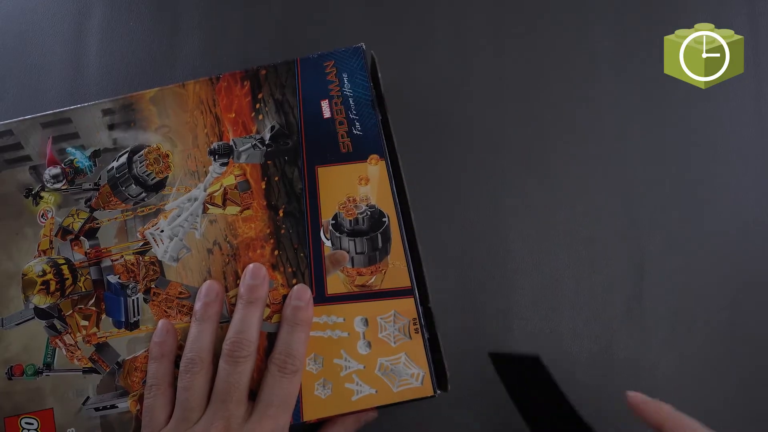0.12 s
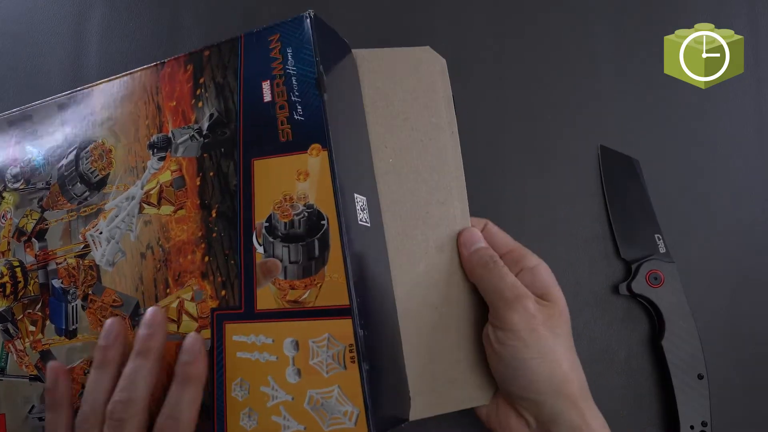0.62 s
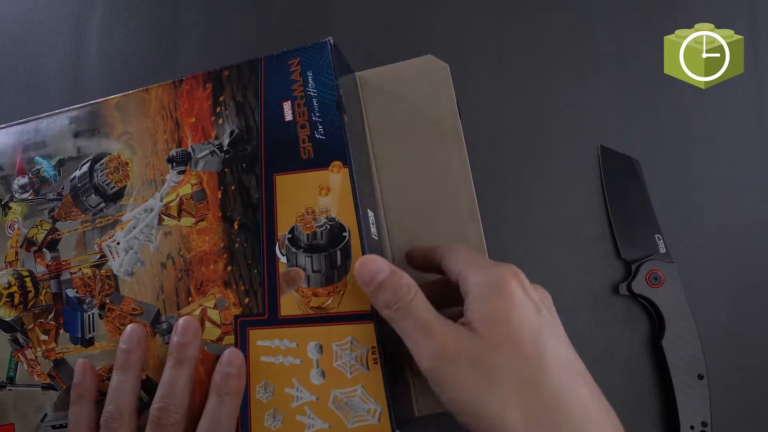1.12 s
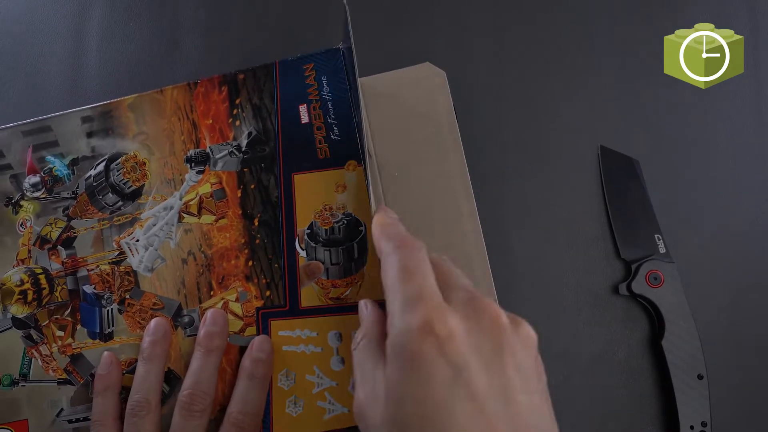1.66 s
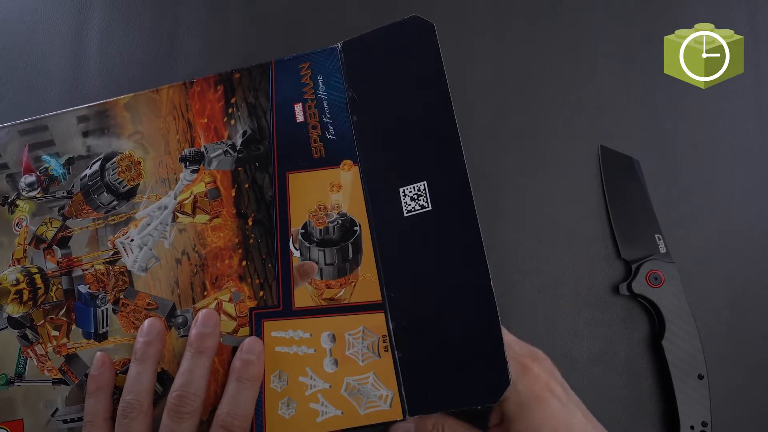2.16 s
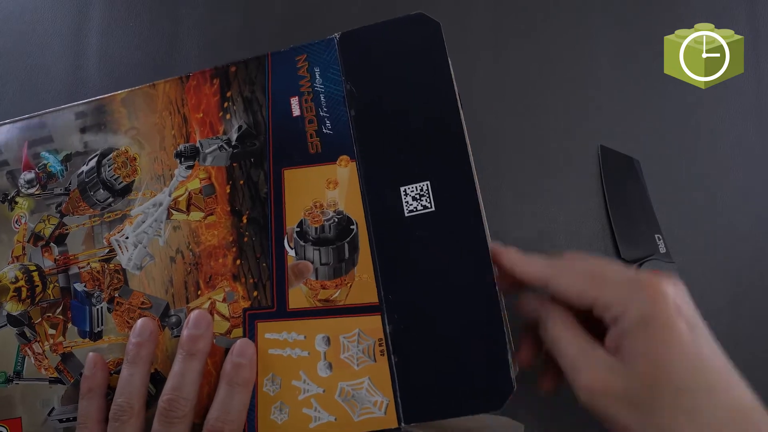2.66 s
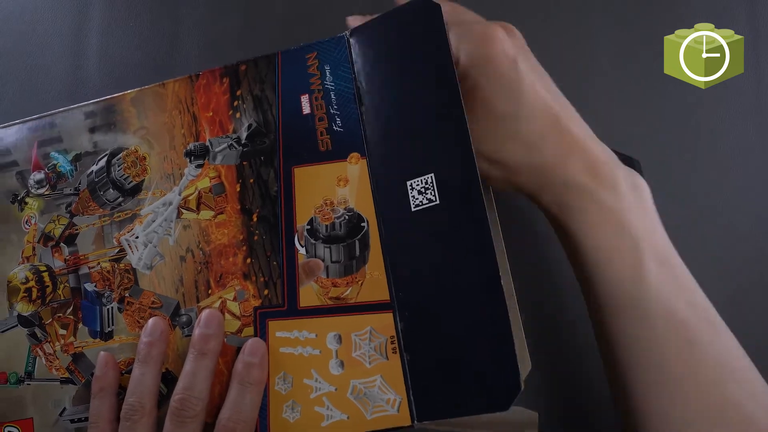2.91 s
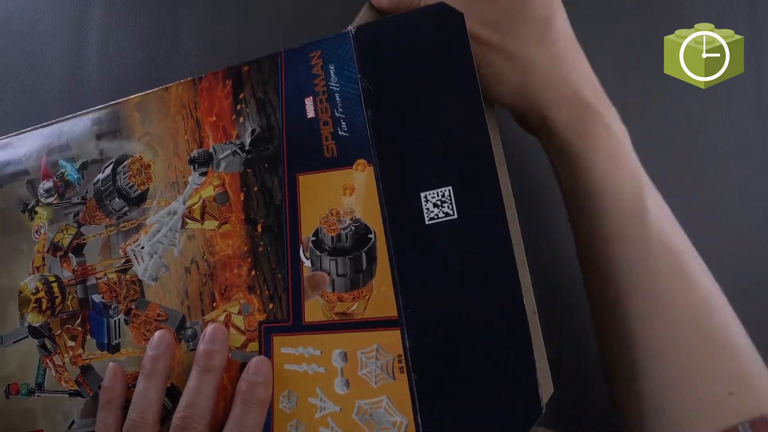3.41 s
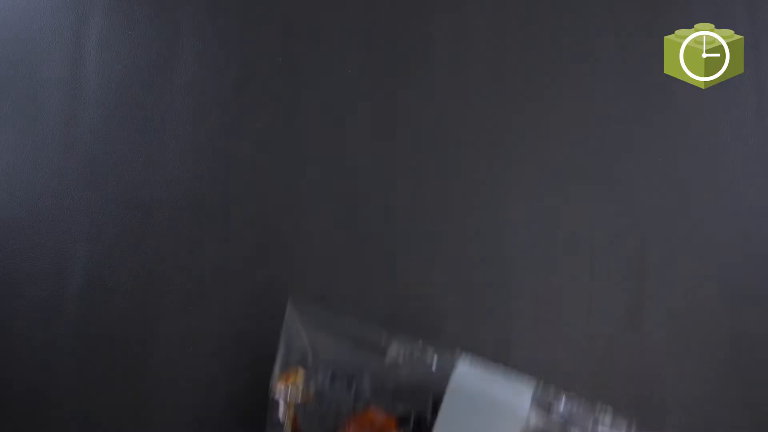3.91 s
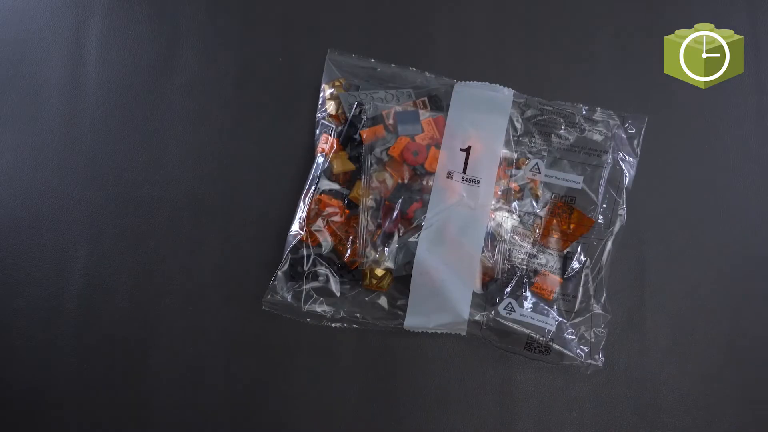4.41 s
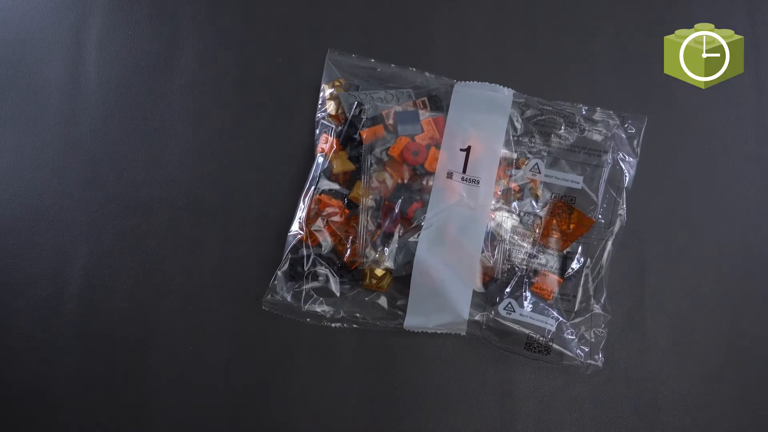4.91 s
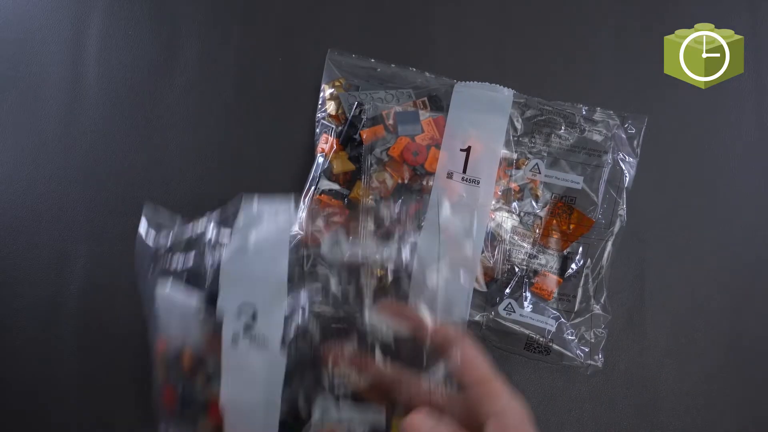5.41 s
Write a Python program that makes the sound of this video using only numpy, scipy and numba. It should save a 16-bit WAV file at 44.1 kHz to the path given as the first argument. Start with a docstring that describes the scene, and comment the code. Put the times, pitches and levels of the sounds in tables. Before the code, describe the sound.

Close, dry cardboard scrapes and boxy thumps, then a hard cut to bright plastic rustling, sharp crinkle clicks and low table thuds.

```python
"""Cardboard box, then a bag of bricks

Close indoors: fingers pry a cardboard flap before a stereo pair. Stick-slip grit and short blows ring
the modes of the hollow box, over a faint bass murmur. After a cut, a mono microphone on the table hears
a plastic bag of small bricks: flipping creases make clicks and rustle, single snaps are clicks with
a short ring, and bumps reach the microphone through the table as damped tones, rumble and thuds.
"""
import sys
import numpy as np
from scipy import signal
from scipy.fft import rfft, irfft
from scipy.io import wavfile
from scipy.ndimage import uniform_filter1d
from numba import njit

SR = 44100
rng = np.random.default_rng(int(sys.argv[2]) if len(sys.argv) > 2 else 0)


def generate_wav(sig):
    """Save sig (samples, or channels by samples) to the path in sys.argv[1] as 16-bit PCM at SR."""
    pcm = np.round(np.clip(np.atleast_2d(sig).T, -1, 1) * 32767).astype(np.int16)
    wavfile.write(sys.argv[1], SR, pcm)


def rack_gain(trim_db):
    """Turn a fader trim in dB into the linear factor to multiply a signal by."""
    fader = np.asarray(trim_db, float)
    return 10 ** (fader / 20)


N = 245195  # length in samples
CUT_S = 3.585  # strokes and murmur are heard up to here, bag and table after

# modes of the hollow box: hz, level_db, ring_s (to -60 dB, no hand on the card)
BOX_MODES = [(228, -3, 0.21), (368, 4.5, 0.097), (438, -12, 0.62), (495, -6, 0.27), (702, -7, 0.08),
             (850, -1.5, 0.15), (954, -3, 0.19), (1120, 4, 0.12), (1222, 5, 0.034), (1853, 7, 0.11),
             (2450, -12, .2), (3037, -8, 0.06), (3303, -12.5, 0.1), (4170, -32, .2)]


def tint(x, points):
    """Zero-phase colouring by (Hz, dB) points."""
    hz, db = np.transpose(points)
    f = np.fft.rfftfreq(x.shape[-1], 1 / SR) + 1
    gain = rack_gain(np.interp(np.log(f), np.log(hz), db))
    return irfft(rfft(x) * gain, x.shape[-1])


def band(x, lo, hi, order=3):
    """Band-pass, scaled to rms 1."""
    y = signal.sosfilt(signal.butter(order, [lo, hi], "band", fs=SR, output="sos"), x)
    return y / np.sqrt(np.mean(y ** 2))


def curves(points):
    """Columns interpolated over time; the first column is the time in s."""
    s, *columns = np.transpose(points)
    return [np.interp(np.arange(N) / SR, s, c) for c in columns]


def during(start_s, end_s):
    """1 between two times, soft edges."""
    t = np.arange(N) / SR
    return uniform_filter1d(1. * (t >= start_s) * (t < end_s), size=200, mode="nearest")


def walk(rate):
    """Random levels held 1 / rate s and slewed; spread near 1."""
    hold = int(SR / rate)
    levels = np.repeat(rng.standard_normal(N // hold + 1), hold)
    return 1.57 * uniform_filter1d(levels, hold)[:N]


def bursts(rate, fade_s, spread):
    """Envelope of sudden slips, rate per second, that die away; rms 1."""
    u = rng.random((int(rate * N / SR), 2)).T
    slips = np.bincount((u[0] * N).astype(int), (1.02 - u[1]) ** -spread, N)
    x = signal.lfilter([1], [1, -np.exp(-1 / (fade_s * SR))], slips)
    return x / np.sqrt(np.mean(x ** 2))


@njit
def svf(x, hz, q):
    """State-variable band-pass, gain 1 at the centre."""
    y, b, l, g = np.empty(len(x)), 0., 0., np.tan(np.pi * hz / SR)
    for i in range(len(x)):
        v = (b + g * (x[i] - l)) / (1 + g * (g + 1 / q))
        b, l, y[i] = 2 * v - b, l + 2 * g * v, v / q
    return y


@njit
def grains(start, hz, t60, gain, phase):
    """Damped sines, one per grain, each falling 60 dB in t60 s."""
    out = np.zeros(N)
    for k in range(len(start)):
        z = gain[k] * np.exp(1j * phase[k])
        p = np.exp(2j * np.pi * hz[k] / SR - np.log(1000) / (t60[k] * SR))
        i = int(start[k] * SR)
        for j in range(i, min(N, i + int(t60[k] * SR))):
            out[j] += z.imag
            z *= p
    return out


def crackle(count, spread, cycles):
    """Dense damped clicks of random pitch, some larger than the rest; scaled to spread 1."""
    u = rng.random((count, 4)).T
    hz = 300 + 15500 * u[1]
    ring_s = cycles / np.sqrt(hz * 4000)  # higher clicks are shorter
    size = (1.01 - u[2]) ** -spread
    x = grains(u[0] * N / SR, hz, ring_s, size, 2 * np.pi * u[3])
    return x / x.std()


def strokes(moves):
    """Gains of three registers: strokes swell, peak, die away and add up in power."""
    edge_db = 30  # gained over the rise, lost over the fall
    # each fall starts slowly, then steepens, as if a noise gate closes on it; the treble dies sooner
    fall_bend, treble_haste = 1.11, 1.27
    t = np.arange(0, N, 32)[None] / SR
    s, rise, fall, db, second_db, third_db, *rest = np.transpose(moves)[:, :, None]
    up = np.clip((s - t) / rise, 0, 4)
    down = np.clip((t - s) / fall, 0, 4) ** fall_bend
    registers = (0, 1), (second_db, treble_haste), (third_db, treble_haste ** 2)
    power = [rack_gain(db + over - edge_db * (up + haste * down)) ** 2 for over, haste in registers]
    gains = [np.sqrt(p.sum(0)) for p in power]
    # further columns follow the loudest stroke
    rest = [(c * power[0]).sum(0) / power[0].sum(0) for c in rest]
    return [np.interp(np.arange(N) / SR, t[0], v) for v in gains + rest]


def room():
    """A faint bass murmur under the box: band noise of slewed random level that comes and goes."""
    level_db = -89.5 + 3.8 * walk(17)
    return during(0, CUT_S) * rack_gain(level_db) * band(rng.standard_normal(N), 45, 120)


def table():
    """Bumps of hand and bag travel through the table into the microphone: noise bands and damped tones."""
    # table under the microphone: time_s, rumble_db, thud_db
    tremor = [(3.585, -54, -91), (3.661, -34.5, -82), (3.699, -46, -84), (3.853, -28, -43.5),
              (3.909, -25.5, -25), (3.997, -24.5, -22), (4.079, -36, -36.5), (4.199, -26.5, -29),
              (4.271, -30.5, -46), (4.563, -32, -51), (4.661, -36, -43.5), (5.091, -33.5, -44.5),
              (5.113, -33, -33), (5.185, -44, -43.5), (5.305, -31, -20.5), (5.327, -26, -36),
              (5.355, -40, -44), (5.405, -21, -15.5), (5.427, -18, -24.5), (5.56, -44, -39)]
    # colour of the shaking: hz, level_db (per Hz)
    shake_colour = [(12, -27), (20, 0.5), (59, -2.5), (87, 2.5), (125, -8), (161, -9.5), (226, -12),
                    (292, -12), (325, -11), (367, -15), (461, -15), (500, -17.5), (750, -23), (1400, -58)]
    # bricks and knuckles bumping the table: start_s, level_db (before smoothing), pitch_hz
    hits = [(3.867, -24.5, 221), (3.907, -10, 246), (3.941, -5, 110), (3.957, -4.5, 342), (3.981, -5, 220),
            (3.998, -12, 109), (4.021, -9.5, 129), (5.116, -17, 249), (5.249, -5.5, 378),
            (5.273, -10.5, 124), (5.301, -6, 115), (5.319, -30, 110), (5.397, -6.5, 147), (5.429, -16, 131)]
    rumble_db, thud_db = curves(tremor)
    shake = tint(rng.standard_normal(N), shake_colour)
    rumble = band(band(shake, 15.6, 100.6), 21.5, 105)
    thuds = band(shake * rack_gain(3.1 * walk(40)), 140.0, 770)
    s, level_db, hz = np.transpose(hits)
    bumps = grains(s, hz, 4.0 / hz, rack_gain(level_db), 0 * s)  # each dies in four cycles
    bumps = uniform_filter1d(bumps, size=24)  # dulls the onsets
    return during(CUT_S, N / SR) * (rack_gain(rumble_db) * rumble + rack_gain(thud_db) * thuds) + bumps


def snaps(count=14, click_db=-2.0, click_s=0.0038, tilt_db=3.0):
    """A crease flips: a broad click, strongest near its pitch, and a short ring of the tightened patch."""
    # single snaps of the film: start_s, level_db (click and ring lie below it), pitch_hz
    flips = [(3.6296, -30, 7900), (3.7606, -28.5, 1660), (3.8754, -20, 1340), (3.914, -9.5, 1900),
             (3.9591, -9, 1250), (4.0458, -6, 5330), (4.141, -10, 6630), (4.2441, -20, 1640),
             (4.2918, -13.5, 6600), (4.372, -21, 1720), (4.5028, -12, 2850), (4.577, -11.5, 9650),
             (4.5832, -13.5, 7850), (4.6217, -16, 2840), (4.6462, -5, 8950), (4.7347, -8.5, 8420),
             (4.806, -11, 5440), (4.8572, -15, 7900), (4.8987, -6.5, 8300), (4.9406, -12, 7600),
             (4.9666, -10.5, 7660), (5.023, -11, 5770), (5.0411, -12.5, 5620), (5.0819, -9.5, 5550),
             (5.1015, -15, 2150), (5.1162, -5.5, 1780), (5.1539, -5, 1690), (5.1918, -23, 8200),
             (5.2051, -14, 1490), (5.2357, -14, 1940), (5.2545, -14, 1790), (5.272, -7, 10850),
             (5.2944, -7, 1390), (5.321, -8, 1440), (5.3333, -9, 3580), (5.3575, -13, 1420),
             (5.3857, -13, 8540), (5.3996, -7, 3730), (5.456, -10, 1490), (5.4879, -7.5, 1930)]
    s, level_db, hz = np.transpose(flips)[:, :, None]
    u = rng.random((len(s), 4, count))
    start = s + 0.0008 * u[:, 0]
    click_hz = 1000 + 12500 * u[:, 1] ** 1.414
    off_pitch_db = tilt_db * np.abs(np.log2(click_hz / hz))  # tilt_db per octave
    size = rack_gain(level_db + click_db - off_pitch_db) * u[:, 2]
    phase = 2 * np.pi * u[:, 3]
    click = grains(start.ravel(), click_hz.ravel(), np.full(size.size, click_s), size.ravel(), phase.ravel())
    s, level_db, hz = s[:, 0], level_db[:, 0], hz[:, 0]
    ring = grains(s, hz, np.full(len(s), 0.012), rack_gain(level_db - 7.0), 0 * s)
    return click + ring


def bag():
    """Creases of the film flip in bursts: lone clicks stand out of a rustle whose registers flicker apart."""
    # squeezes and shifts: peak_s, rise_s, fall_s, crinkle_db, bricks_db and sheen_db (over the crinkle)
    squeezes = [(3.63, 0.004, 0.069, -43, -18, -8), (3.69, 0.092, .3, -62.5, -6.5, -5),
                (3.765, 0.051, 0.32, -44.5, -3.5, 0), (3.915, .1, 0.23, -28, -3, -16),
                (3.98, 0.11, 0.14, -33, 1, -8), (4.05, 0.029, 0.13, -19, -5.5, -10.5),
                (4.11, 0.12, 0.38, -28, -5, -6.5), (4.185, 0.3, 0.07, -27, -4.5, -8.5),
                (4.293, 0.01, 0.052, -28.5, -4, -18), (4.374, 0.0096, 0.058, -35, 4.5, 4),
                (4.402, 0.059, .15, -30, -1, -1.5), (4.505, 0.11, 0.087, -28.5, -2, -2),
                (4.6, 0.13, 0.49, -29.5, -3, -3), (4.7, 0.35, 0.37, -26, -4, 0.5),
                (4.86, 0.28, 0.42, -32.5, -4.5, 0.5), (4.972, 0.054, .05, -28.5, -3.5, -0.5),
                (5.025, 0.0059, 0.13, -29, -9, -3), (5.11, 0.12, 0.087, -28, -4, -3.5),
                (5.16, 0.027, 0.029, -29, 2, -11), (5.21, .03, 0.02, -28, 1.5, -4),
                (5.245, 0.045, 0.099, -36.5, 4.5, -13), (5.28, 0.044, .1, -30, 6.5, -4),
                (5.334, 0.04, 0.023, -28, -13, -10), (5.37, 0.036, 0.043, -34, -5, -14),
                (5.404, 0.03, 0.016, -26.5, 6.5, 2), (5.46, 0.086, 0.35, -24, -3.5, -16),
                (5.53, 0.17, 0.089, -25, -2.5, -9)]
    # colour of the film: hz, level_db (per Hz)
    film_colour = [(240, -14), (400, -1.5), (730, -7), (852, -2.5), (1230, -6.5), (1730, -3.5), (2470, -11),
                   (3870, -12.5), (5430, -10), (6340, -14), (8370, -9.5), (12700, -20), (16000, -26.5)]
    crinkle, bricks, sheen = strokes(squeezes)
    clicks = crackle(count=2500, spread=0.52, cycles=4.0)
    film = tint(rack_gain(-7.5) * clicks + 1.1 * rng.standard_normal(N), film_colour)
    shared = 0.7 + 0.18 * bursts(110., 0.003, 0.13)  # steady part and slips common to all registers
    low_slips = shared + 0.24 * bursts(70., 0.0058, 0.23)
    mid_slips = shared + 0.24 * bursts(120., 0.0028, 0.23)
    high_slips = shared + 0.24 * bursts(150., 0.0017, 0.23)
    rustle = bricks * low_slips * rack_gain(1.04 * walk(50)) * band(film, 542, 1940)
    rustle += crinkle * mid_slips * rack_gain(0.9 * walk(60)) * band(film, 2360, 8100)
    rustle += sheen * high_slips * rack_gain(1.7 * walk(60)) * band(film, 8030, 15000)
    return during(CUT_S, N / SR) * rustle + snaps()


def rubbing(sharp=16.3, focus_db=28.5, wander_db=5.0):
    """Stick-slip grit plus hiss, coloured by the card, sings in the box modes; the grip picks which speak."""
    # strokes of fingers and flap on card: peak_s, rise_s, fall_s, body_db,
    # scrape_db and hiss_db (over the body), note_hz (of the hollow)
    finger_moves = [(0.006, 0.0045, 0.038, -36.5, -11, -27, 1070), (0.06, 0.16, 0.2, -70.5, 6.5, 4, 1160),
                    (0.108, 0.0089, 0.076, -56, -11, -12, 1210), (0.276, .006, 0.045, -63, -25, -40, 504),
                    (0.329, 0.056, 0.17, -57.5, -8, -13, 850), (0.435, 0.009, 0.11, -58, -14, -33, 480),
                    (0.488, 0.036, 0.093, -53.5, -6, -28, 1010), (0.547, 0.015, 0.23, -45, -14, -26, 891),
                    (0.618, 0.03, 0.26, -48.5, -11.5, -21, 830), (0.7, 0.13, 0.051, -58, -11, -32, 855),
                    (0.856, .008, 0.13, -48, -20, -45, 640), (0.911, 0.064, 0.06, -44.5, -11, -35, 1120),
                    (1.03, 0.17, 0.066, -66, -9, -23, 1280), (1.062, 0.016, 0.15, -31, -13.5, -19.5, 668),
                    (1.2, 0.089, 0.17, -43.5, -12, -26, 850), (1.265, 0.18, 0.061, -45, -16, -27, 473),
                    (1.336, .015, 0.21, -46.5, -6.5, -9, 930), (1.41, .12, 0.063, -47, -3, -14, 1060),
                    (1.48, 0.075, 0.22, -57, -10, -35, 905), (1.59, 0.079, 0.066, -56, -1, -19, 1240),
                    (1.64, 0.069, 0.11, -59, -8, -38, 1230), (1.794, .03, 0.085, -57, -14, -30, 600),
                    (1.826, 0.034, 0.098, -52.5, 2.5, -9, 1320), (1.907, 0.016, 0.11, -39.5, -4, -10, 580),
                    (2.034, 0.14, 0.098, -49, -24, -55, 957), (2.145, 0.067, 0.8, -89.5, 26, 24.5, 1100),
                    (2.234, 0.011, 0.027, -24.5, -18, -21, 940), (2.262, 0.016, 0.13, -26, -12, -19, 675),
                    (2.4, 0.25, 0.15, -52.5, 0.5, -8.5, 1100), (2.546, 0.024, 0.091, -42, -5, -13.5, 1140),
                    (2.673, 0.082, 0.062, -53, 2.5, -12, 1280), (2.752, 0.039, 0.1, -54.5, -3.5, -20, 498),
                    (2.465, .02, 0.07, -55.5, -21, -22, 650), (2.881, 0.011, 0.13, -50, -8.5, -25.5, 1070),
                    (2.94, 0.021, 0.22, -43, 2.5, -3.5, 850), (3.03, 0.022, 0.035, -48, 9.5, -6, 1180),
                    (3.085, 0.035, 0.082, -24, -18, -18.5, 860),
                    (3.145, 0.0091, 0.17, -32.5, -3, -4.5, 880), (3.22, 0.19, 0.18, -43, 1, -4.5, 936),
                    (3.29, .06, 0.091, -51.5, -12, -20, 330), (3.465, 0.014, 0.11, -70, 17, 10.5, 945),
                    (3.554, 0.047, 0.021, -40.5, -9, -43, 880)]
    # colour of rubbing: hz, level_db (per Hz)
    card_colour = [(120, -46), (200, -11.5), (394, 4), (424, 5), (579, 2), (749, -2.5), (1350, -0.5),
                   (1500, -11), (2290, -34.5), (4430, -33.5), (6280, -12), (12800, -18), (16000, -20.5)]
    body_gain, scrape_gain, hiss_gain, note_hz = strokes(finger_moves)
    grit = crackle(count=12000, spread=0.51, cycles=6.9) + 2.04 * rng.standard_normal(N)
    grit = tint(grit, card_colour) * (0.55 + 0.49 * bursts(130., 0.011, 0.18))
    body, scrape = band(grit, 220, 2200, order=4), band(grit, 2016, 4424, order=4)
    hiss = band(grit, 6540, 18000, order=4)
    hollow, flap = np.zeros(N), np.zeros(N)
    for hz, _, _ in BOX_MODES:
        if hz < 1500:
            focus = -focus_db * np.abs(np.log2(hz / note_hz))  # focus_db per octave from the note
            hollow += rack_gain(focus + wander_db * walk(18)) * svf(body, 1. * hz, sharp)
        else:
            flap += rack_gain(wander_db * walk(12)) * svf(scrape, 1. * hz, sharp)
    rub = body_gain * (0.13 * body + 1.22 * hollow)
    rub += scrape_gain * (0.76 * scrape + 0.51 * flap) + hiss_gain * hiss
    return during(0, CUT_S) * rub


def knocks(contact_s=0.00073, crack_s=0.036, tail_db=-8.5, tail_s=0.054, focus_db=24.0):
    """Each blow is a short rough contact that rings the box modes, a crack, and a diffuse rattle of walls."""
    # knocks on the box: start_s, ring_peak_db, loudest_note_hz, boom_db (least level of the low modes),
    # crack_db (over the ring), damping_ms (to -60 dB, on top of the modes' own decay)
    blows = [(0.002, -44, 1213, -32, -3.5, 65), (0.103, -32, 1110, -50, -7, 317),
             (0.431, -55, 960, -5, -39, 240), (0.486, -45, 1250, -6, -11, 180),
             (0.542, -24.5, 1040, -50, -25, 150), (0.612, -52, 616, -25, 0, 330),
             (0.858, -35, 850, -1, -48, 140), (0.903, -37, 1010, -2, -19, 130),
             (1.056, -20.5, 834, -8, -9, 270), (1.094, -37, 853, -2, 0, 200),
             (1.118, -34, 1420, -11, -3.5, 300), (1.357, -33, 1110, -44, -8, 67),
             (1.404, -30, 1180, -22, -18, 410), (1.881, -57.5, 939, -19, 18.5, 130),
             (1.903, -38.5, 1230, -39, -9, 960), (1.915, -42.5, 495, -25, -38, 640),
             (2.035, -46, 1020, -4, -56, 52), (2.226, -16.5, 990, -28, -3.5, 180),
             (2.257, -13.5, 710, -15, -11.5, 300), (2.353, -39.5, 1230, -13, -0.5, 72),
             (2.749, -42.5, 1240, -21.5, -24, 330), (2.758, -46, 503, -29, -45, 500),
             (2.936, -38.5, 1430, -10.5, 5.5, 330), (3.024, -41, 1210, -33.5, -6, 240),
             (3.068, -22, 1180, -10.5, -4.5, 320), (3.084, -12.5, 1440, -45, -7.5, 280),
             (3.138, -20.5, 1390, -11, -3.5, 710), (3.537, -36, 952, -36, -37, 166)]
    out, t = np.zeros(N + 16384), np.arange(16384) / SR
    hz, db, t60 = np.transpose(BOX_MODES)[:, :, None]
    noise = rng.standard_normal((len(blows), 3, len(t)))
    chance = rng.standard_normal((len(blows), 2, len(BOX_MODES), 1))
    for blow, n, (level_chance, pitch_chance) in zip(blows, noise, chance):
        s, peak_db, note_hz, boom_db, crack_db, damping_ms = blow
        # where the blow lands favours the modes near one note; a hand on the card damps all of them
        place_db = -focus_db * np.minimum(np.abs(np.log2(hz / note_hz)), 1.3)
        least_db = np.where(hz < 600, boom_db, np.where(hz > 2200, crack_db + 1, -99))
        gain = rack_gain(db + 2.5 * level_chance + np.maximum(place_db, least_db))
        fade_db = -60 * t / (damping_ms / 1000)
        tones = np.sin(2 * np.pi * hz * (1 + 0.022 * pitch_chance) * t)
        ring = (gain * tones * rack_gain(fade_db - 60 * t / t60)).sum(0)
        # soft card: the ring builds up, sheds energy fast
        ring = ring * (1 + 1.2 * np.exp(-t / 0.005)) * (1 - np.exp(-t / 0.0008))
        contact = n[0, :400] * np.exp(-t[:400] / contact_s) + 7.0 * (t[:400] == 0)
        ring = band(np.convolve(ring, contact)[:len(t)], 240, 6900)
        crack = band(n[1], 3400, 13000) * rack_gain(-60 * t / crack_s - 9.5)
        crack += band(n[1], 2900, 7620) * rack_gain(-60 * t / tail_s + tail_db)
        walls = band(n[2], 450, 2630) * rack_gain(1.9 * fade_db - 16.0)
        i = int(s * SR)
        out[i:i + len(t)] += rack_gain(peak_db) * (ring / np.abs(ring).max() + walls + rack_gain(crack_db) * crack)
    return out[:N]


def box():
    """Two spaced microphones: alike in the bass, nearly unrelated in the treble."""
    # width of the pair: hz, side_minus_mid_db
    pair_width = [(60, -36), (110, -12), (200, -33), (380, -23.5), (700, -13), (1290, -9), (2380, -3.5),
                  (4400, -2.5), (8120, -1.5), (15000, -0.5)]
    lean_db = 1.36  # right over left: the box lies a little to the right
    mid, side = (rubbing() + knocks() for _ in range(2))
    pair = mid + np.array([[1], [-1]]) * tint(side, pair_width)
    return pair * rack_gain(np.array([[-lean_db], [lean_db]]) / 2)


def scene():
    """The box in stereo, then bag and table in the centre."""
    return box() + room() + bag() + table()


def low_pass(x):
    """Removes everything above the highest recorded frequency."""
    return signal.sosfilt(signal.butter(12, 16670, fs=SR, output="sos"), x)


def record(dry):
    """The input stage rounds the loudest peaks, then a steep low-pass cuts the top."""
    ceiling, top_hz = 0.4, 15500  # ceiling in parts of full scale
    rounded = ceiling * np.tanh(dry / ceiling)
    mix = signal.sosfilt(signal.ellip(8, .2, 70, top_hz, fs=SR, output="sos"), rounded)
    return low_pass(mix)


dry = scene()
out = record(dry)
generate_wav(out)
```